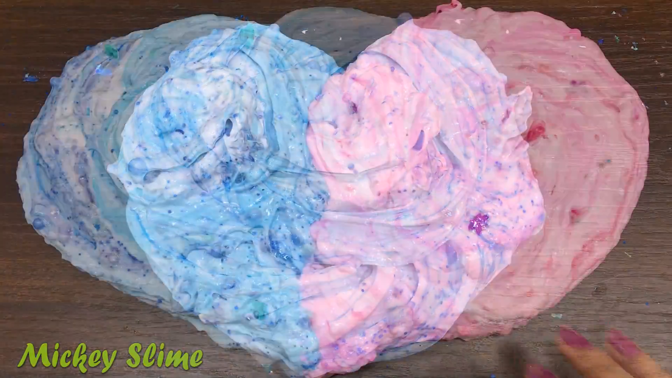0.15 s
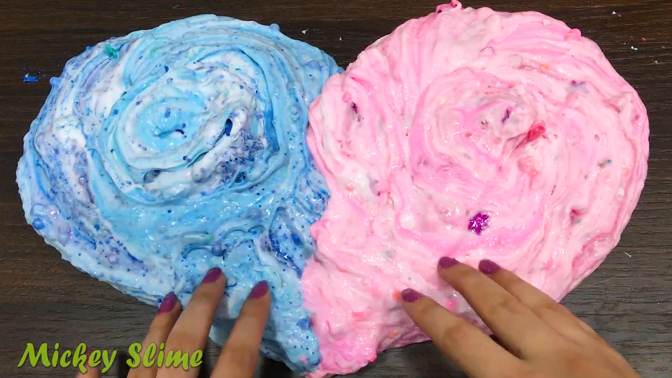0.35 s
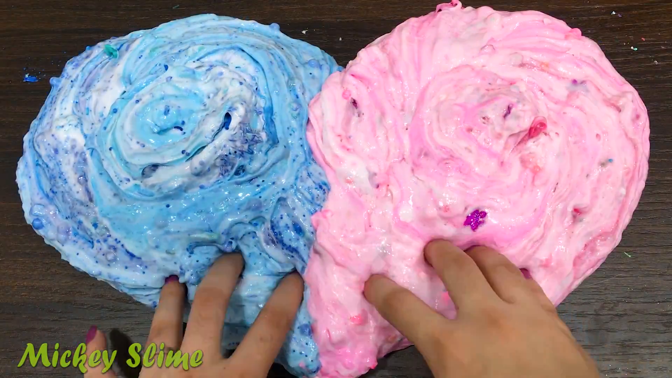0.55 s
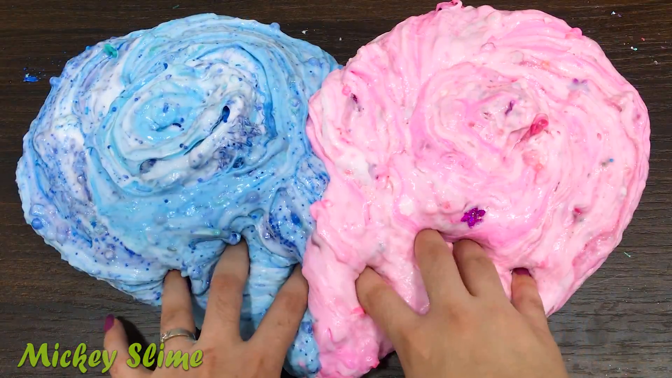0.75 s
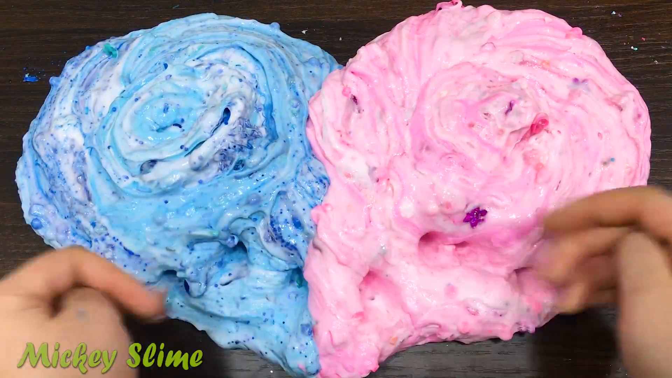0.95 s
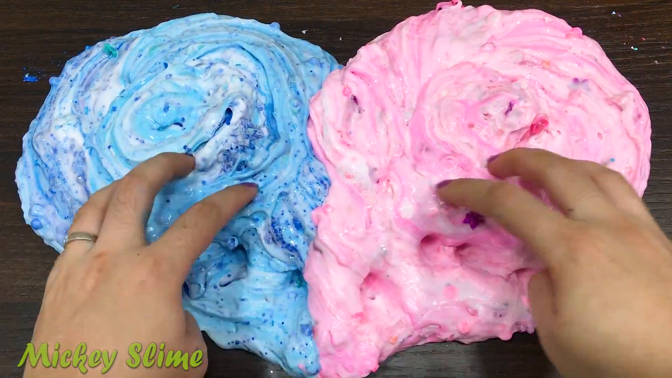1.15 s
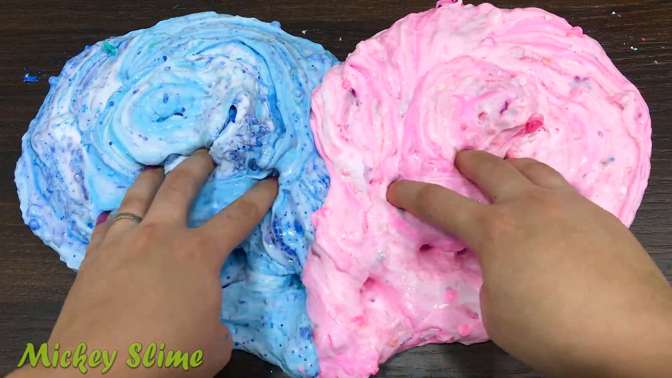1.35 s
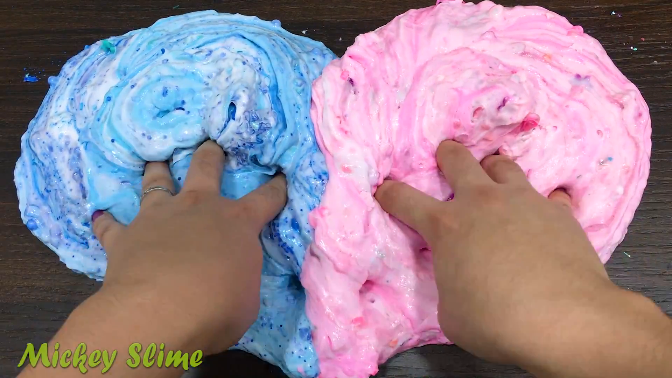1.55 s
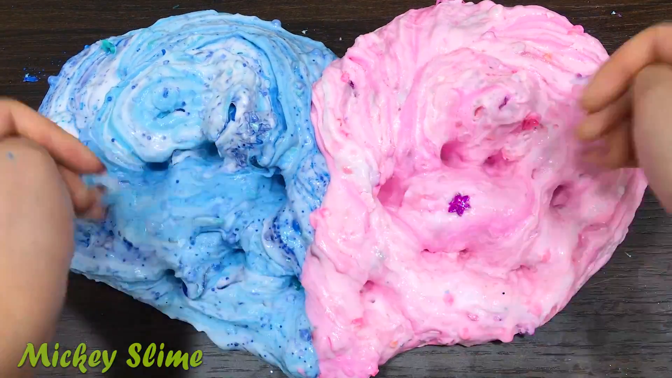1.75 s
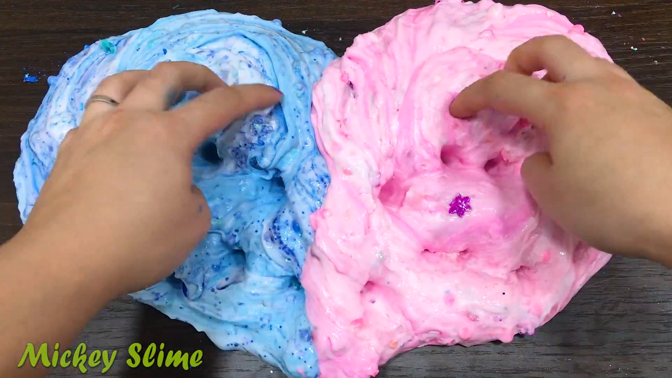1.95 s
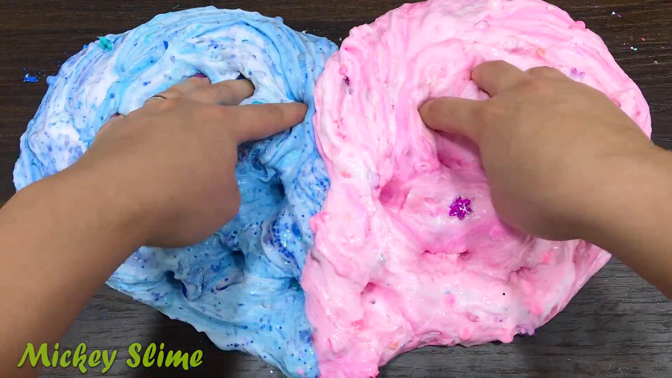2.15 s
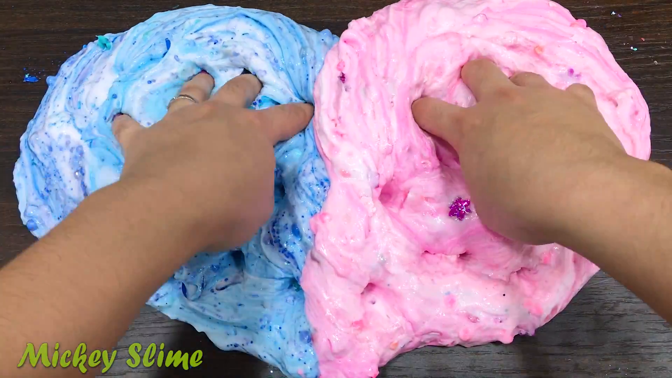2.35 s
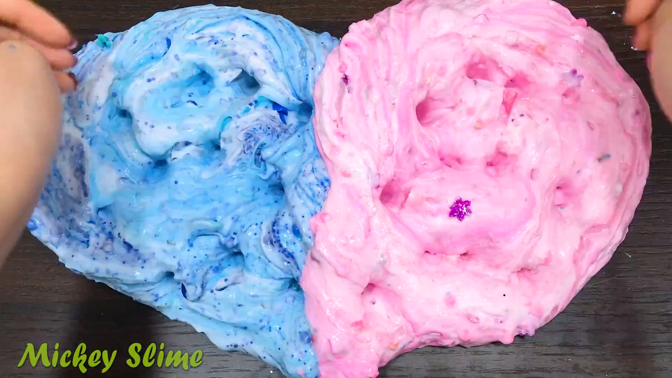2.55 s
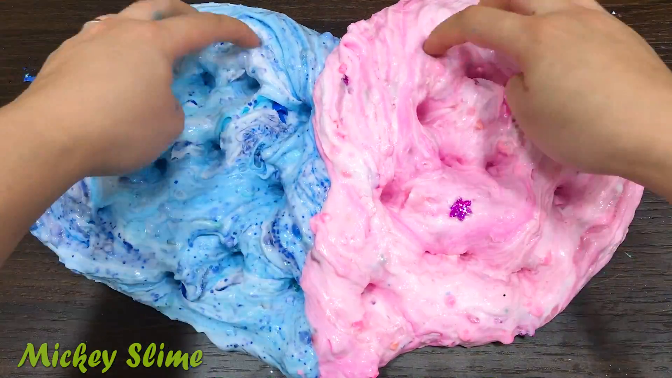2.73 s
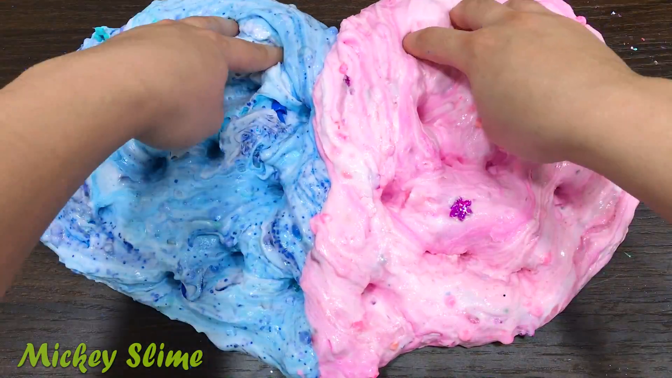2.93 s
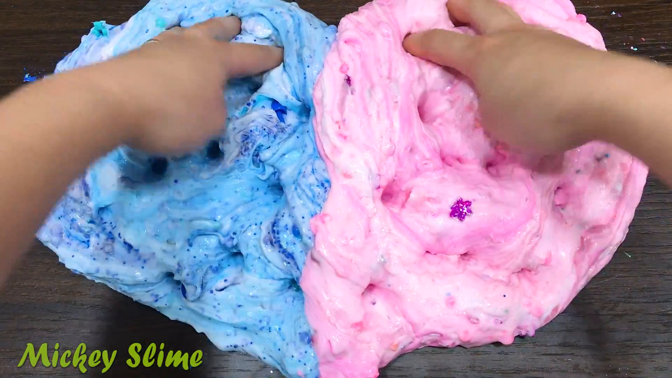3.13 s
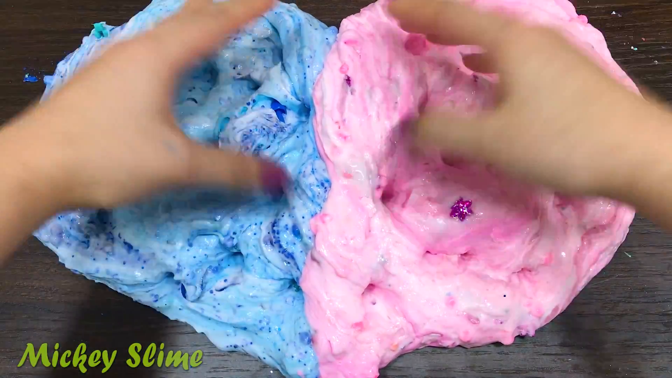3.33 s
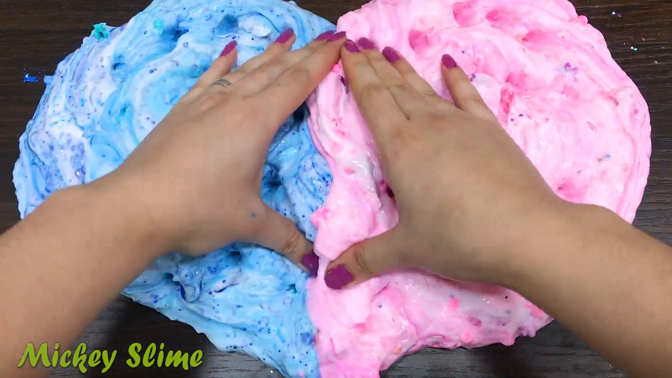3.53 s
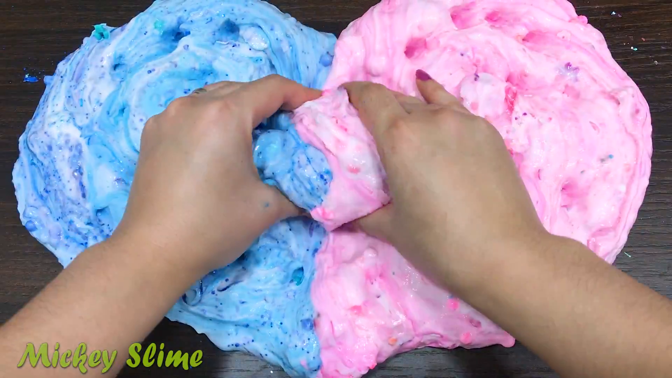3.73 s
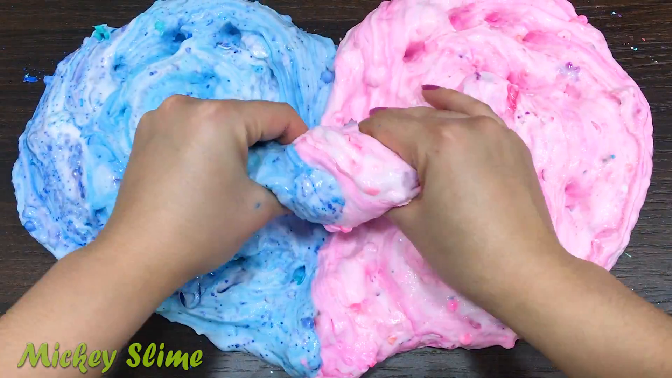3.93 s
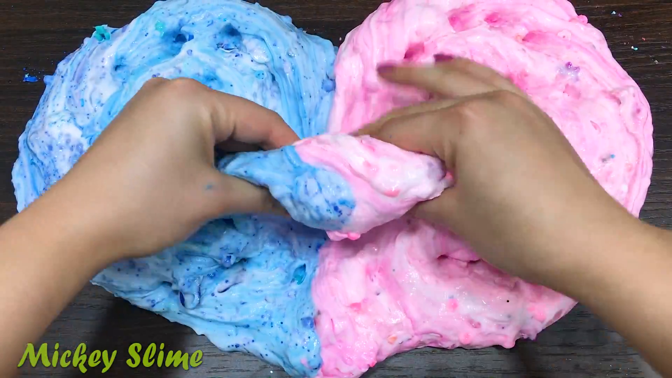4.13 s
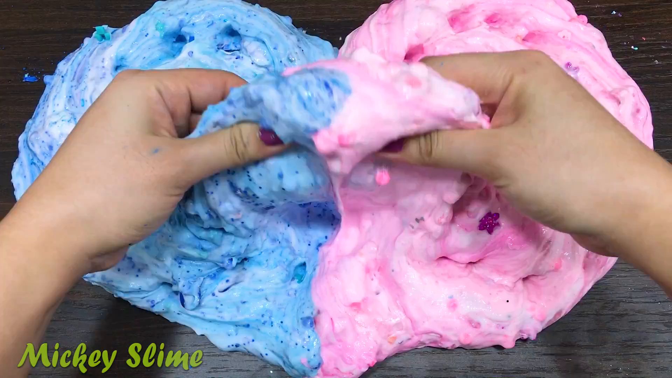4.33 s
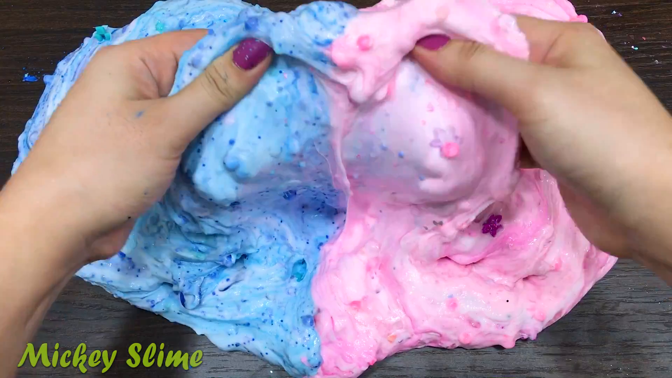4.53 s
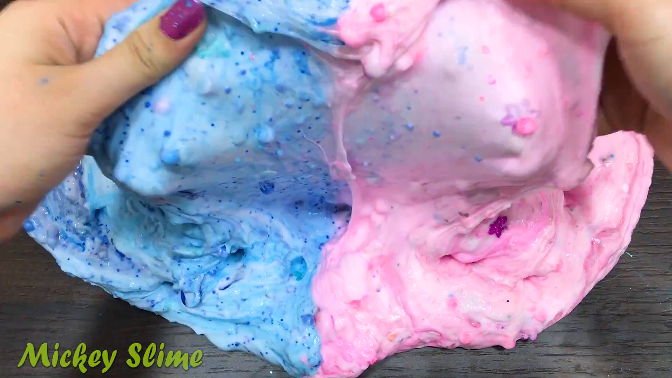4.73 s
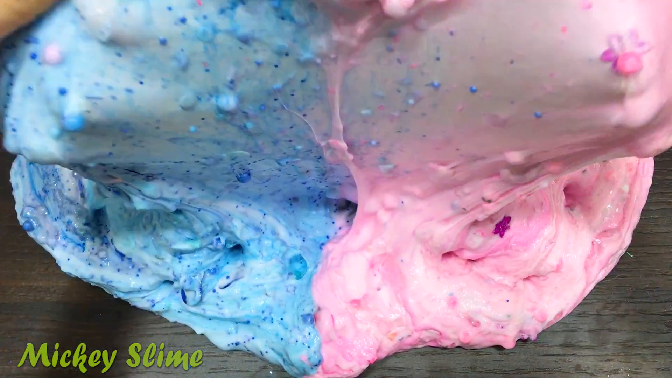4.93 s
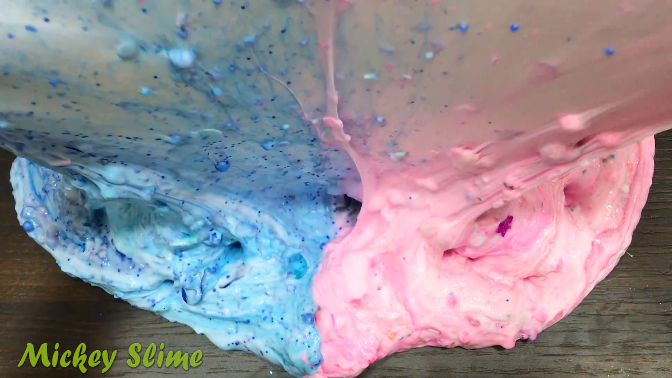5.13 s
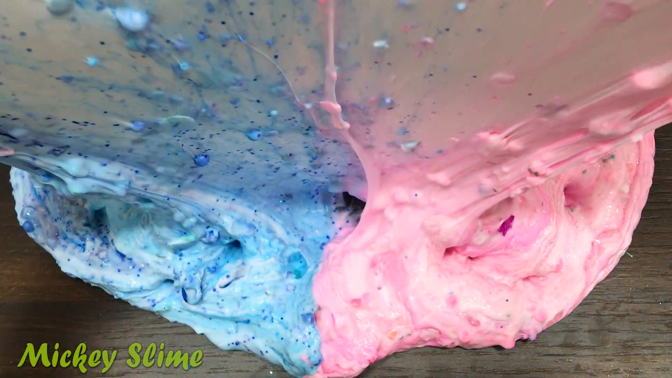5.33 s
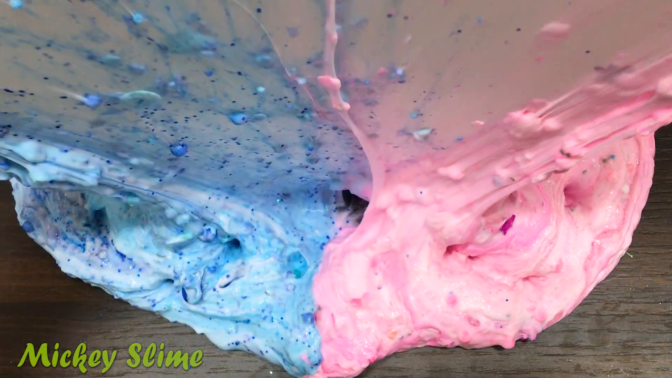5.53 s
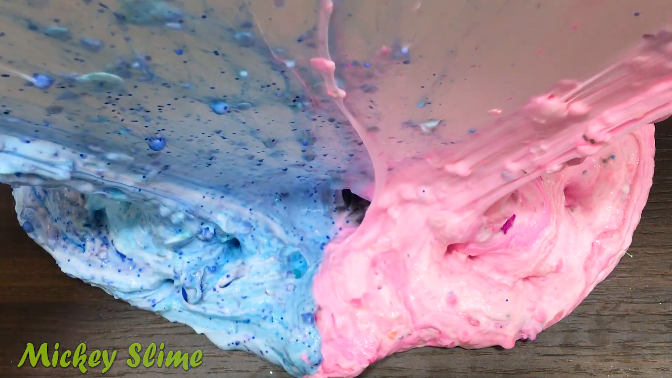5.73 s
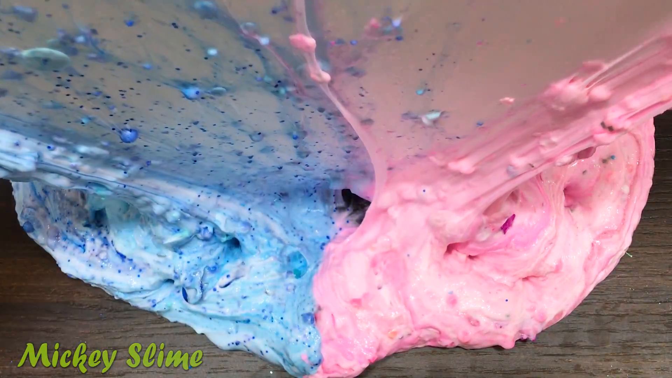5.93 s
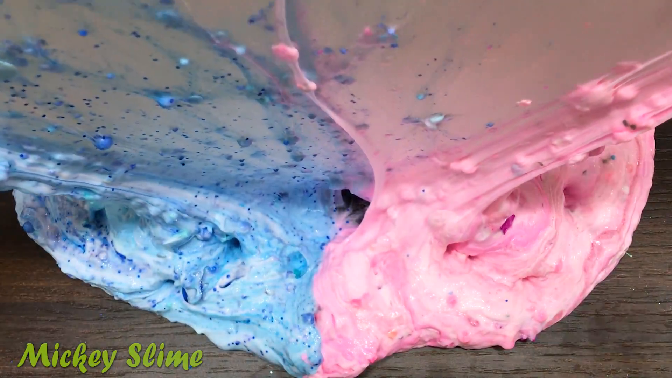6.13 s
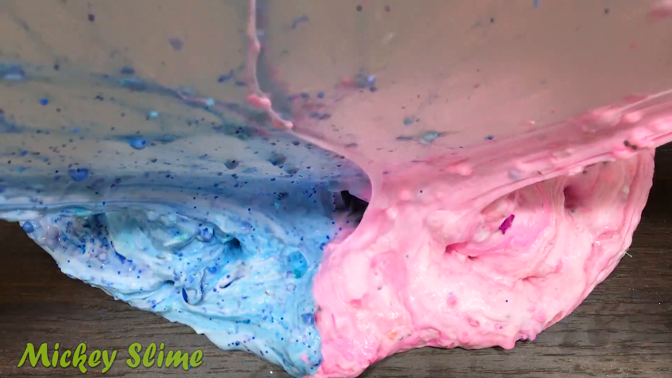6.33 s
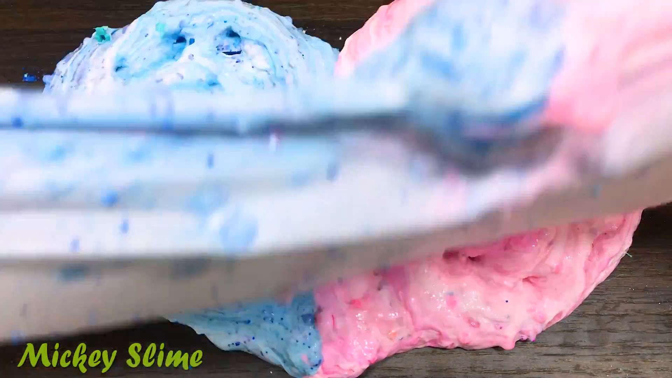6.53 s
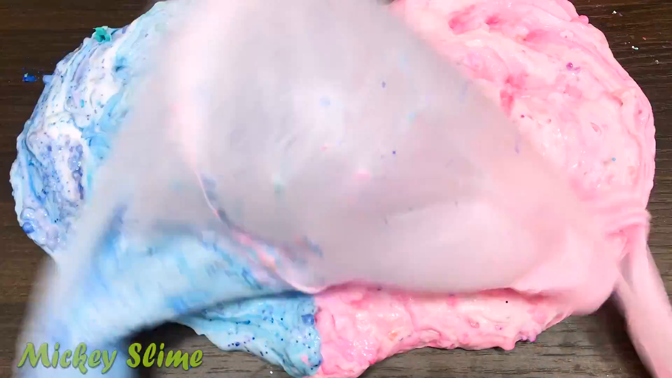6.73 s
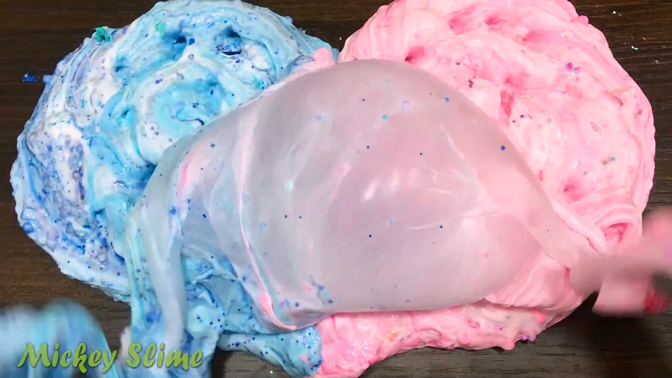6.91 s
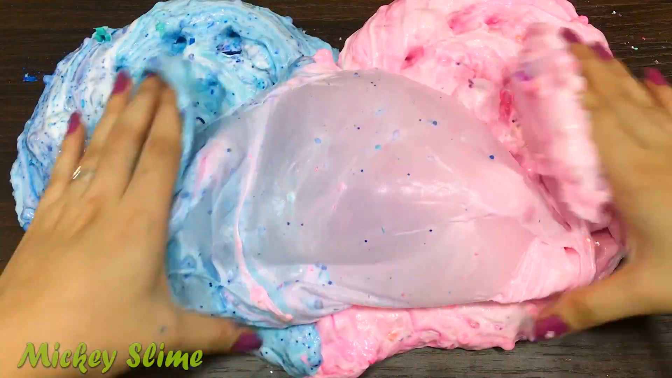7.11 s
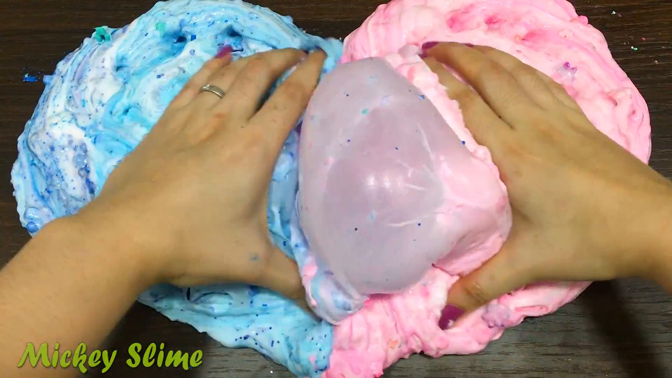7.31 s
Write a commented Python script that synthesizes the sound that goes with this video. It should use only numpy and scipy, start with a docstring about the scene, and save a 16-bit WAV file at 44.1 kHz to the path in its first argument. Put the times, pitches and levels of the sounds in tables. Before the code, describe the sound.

Fingers knead foamy beaded slime, quiet crackling broken by four loud wet peels, a faint stretch, and one heavy popping flop that echoes briefly.

```python
"""A bare, ringing room, heard close to a heap of wet slime that fingers press and tear free of four times;
then a sheet is lifted, stretched and dropped as a bubble. Bursting air pockets are sub-millisecond noise
bursts in set bands; plops and thuds are gliding decaying sines; foam is random ruptures and ringing bubbles.
Resonant hollows colour each peel, and wall echoes and a diffuse tail answer it. Low air noise lies below all,
and the sound of earlier handling fades from the start, then stops abruptly."""
import sys
import numpy as np
from scipy import signal
from scipy.fft import rfft, irfft, next_fast_len
from scipy.io import wavfile

SR = 44100
rng = np.random.default_rng(int(sys.argv[2]) if len(sys.argv) > 2 else 0)


def transcribe(signal):
    """Save signal, clipped to [-1, 1], as a 16-bit WAV file at the path in sys.argv[1]."""
    frames = np.atleast_2d(signal).T
    limited = np.clip(frames, -1, 1)
    pcm = np.round(limited * 32767).astype(np.int16)
    wavfile.write(sys.argv[1], SR, pcm)


N = 329416
TIME = np.arange(N) / SR  # seconds

# Spectrum of earlier handling, relative: pitch_hz, density_db (per Hz)
EARLIER_SPECTRUM = [(30, -14), (100, -13), (330, 1.5), (900, -12), (2000, -9), (8000, -14.5), (16000, -23)]
# Spectrum of the background air, relative: pitch_hz, density_db (per Hz)
AIR_SPECTRUM = [(20, -27), (35, -16), (55, 3.5), (130, -4), (200, -7), (350, -10), (500, -15.5),
                (1000, -21.5), (3000, -24.5), (8000, -28.5), (16000, -36.5)]
# Fingers pressing, pinching or pulling, levels before the mix: start_s, hold_s, crackle_db, squish_db
STROKES = [(0.536, 0.18, -65.5, -75.5), (1.24, 0.28, -62, -60), (2.086, 0.016, -49.5, -52),
           (2.232, 0.026, -60, -59.5), (2.87, 0.19, -74, -71.5), (3.64, 0.34, -58, -66),
           (4.148, 0.043, -50.5, -55.5), (4.461, 0.29, -59.5, -71), (5.018, 0.67, -65.5, -81),
           (7.27, 0.26, -56.5, -57.5)]
# Tiny bubbles: pitch_hz, size_db
FIZZ_BUBBLES = [(800, -1.5), (2500, -6.5), (5000, 7.5), (9000, -0.5), (12000, 6), (14500, -11)]
# Larger, wet bubbles: pitch_hz, size_db
SQUELCH_BUBBLES = [(350, 4), (800, 0), (1500, 3), (2600, -11)]
# Spectrum of tearing foam, relative: pitch_hz, density_db (per Hz)
FOAM_SPECTRUM = [(200, -19.5), (700, -12.5), (2500, 1), (5000, 9), (9000, 4.5), (13000, 9.5), (16000, 10.5)]
# Spectrum of the soft wet mass, relative: pitch_hz, density_db (per Hz)
SQUISH_SPECTRUM = [(40, -19), (150, -3), (400, -0.5), (1000, -10), (2200, -7), (4000, -18), (10000, -36)]
# Larger air pockets bursting, levels before the mix: start_s, level_db (over 1 ms), low_edge_hz, high_edge_hz
POCKET_BURSTS = [(.5947, -38, 9200, 13300), (.6594, -39.5, 2750, 15600), (.7818, -50, 660, 13500),
                 (.7977, -51, 1210, 12900), (.961, -33, 890, 13700), (.9702, -13.5, 603, 16900),
                 (.9947, -16.5, 660, 11000), (.9982, -11.5, 1030, 16200), (1.006, -22, 2960, 4100),
                 (1.015, -15, 910, 9040), (1.0344, -27, 900, 10200), (1.2693, -26, 4040, 16750),
                 (1.272, -30.5, 1497, 16500), (1.3193, -35.5, 4460, 15900), (1.3365, -24, 4630, 15900),
                 (1.543, -27.5, 10100, 13000), (1.5945, -30.5, 3830, 16500), (1.7651, -25, 990, 11600),
                 (1.7763, -32, 490, 8600), (1.7995, -13.5, 3900, 8500), (1.803, -19, 487, 12300),
                 (2.23, -40, 1370, 3000), (2.2557, -42.5, 6600, 16300), (2.5323, -22, 7450, 10100),
                 (2.5385, -27, 990, 8950), (2.5415, -15, 1070, 11000), (2.5607, -11.5, 1180, 10500),
                 (2.575, -27, 1960, 2960), (2.8867, -37.5, 6000, 16800), (2.9481, -36, 7600, 16500),
                 (3.1843, -41.5, 1800, 16500), (3.2735, -17.5, 660, 16600), (3.2763, -13.5, 1510, 11600),
                 (3.6182, -13, 2960, 12000), (3.7158, -21, 1010, 9600), (3.767, -31.5, 1480, 16500),
                 (3.9102, -35, 490, 2720), (3.913, -34, 1350, 3340), (3.9184, -22, 7240, 16500),
                 (4.189, -43.5, 600, 6500), (4.4102, -34, 1100, 5500), (4.4855, -42, 7360, 9500),
                 (4.603, -39, 730, 6700), (4.6442, -43, 1100, 1540), (4.8705, -42, 3570, 16500),
                 (5.0363, -45, 1480, 7150), (5.129, -43, 1480, 9900), (5.1507, -32, 1250, 2450),
                 (5.4416, -46, 1970, 14500), (5.5526, -42, 985, 1340), (5.5691, -34.5, 1000, 1366),
                 (6.1777, -41.5, 4900, 13670), (6.8123, -28.5, 2360, 3420), (6.8316, -15.5, 1930, 10000),
                 (6.846, -31, 8140, 10600), (6.8572, -13, 400, 10000), (6.8594, -18, 400, 2130),
                 (7.2748, -33.5, 2980, 6340), (7.2956, -35.5, 2770, 3640), (7.328, -38, 3050, 3970),
                 (7.4365, -36.5, 600, 12200)]
# Early reflections: delay_s, level_db
WALL_ECHOES = [(.0045, -20.5), (.0065, -17.5), (0.0099, -18), (0.0119, -20)]
# Time for the tail to die by 60 dB: pitch_hz, decay_s
ROOM_DECAY = [(100, 0.74), (260, 0.42), (700, 0.76), (1840, 0.76), (4850, 0.73), (9000, 0.67),
              (15000, 0.72)]
# Colour of the diffuse tail: pitch_hz, gain_db
ROOM_COLOUR = [(60, -2), (200, 0.5), (400, -1.5), (750, 0.5), (1200, -3), (2500, -1.5), (5000, -5),
               (8500, -6), (12000, -8.5), (16000, -14.5)]
# Standing waves of the room, levels before the tail's gain: pitch_hz, level_db
STANDING_WAVES = [(300, -61), (358, -57.5), (491, -62), (689, -67.5), (733, -61.5), (1031, -68.5)]
# Slime peeling from skin or table, or the sheet landing, levels before the top-edge filter and the mix:
# full_strength_s, rise_s, hold_s, foam_db, body_db, high_edge_hz (foam only), hollow_pitch_hz
PEELS = [(0.964, 0.013, 0.037, -35, -48, 15500, 1540), (1.776, 0.02, 0.044, -30, -35.5, 12400, 2470),
         (2.557, 0.026, 0.0047, -24.5, -34.5, 11700, 2470), (3.275, 0.029, 0.018, -28, -39.5, 11500, 1320),
         (4.411, 0.014, 0.058, -45, -64.5, 5300, 4100), (6.807, 0.086, 0.018, -44, -51.5, 7600, 4350),
         (6.835, 0.0061, 0.03, -24.5, -41, 10800, 1030)]
# Resonances of a hollow: pitch_multiple (of the hollow's pitch), added_db
HOLLOW_MODES = [(1, -1), (1.98, -6), (3.1, -13)]
# Cavities that open or shut: start_s, peak_db, pitch_hz (near the peak), cycles_to_peak
PLOPS = [(.9695, -24, 685, 0.58), (.996, -23, 460, 0.78), (1.000, -27.5, 320, 1), (1.035, -29, 640, 0.89),
         (1.777, -30, 314, 1.4), (1.794, -28, 380, 2), (1.807, -28.5, 345, 1.14), (2.541, -27.5, 580, 1),
         (2.566, -20.5, 536, .8), (2.573, -22, 780, 1.2), (3.271, -21.5, 946, 0.68),
         (3.2925, -23.5, 830, 0.92), (3.311, -27, 700, .6), (3.618, -35, 674, 0.6),
         (5.5683, -34, 430, 0.88), (6.856, -16.5, 930, 0.86), (6.857, -26, 283, 0.82),
         (6.862, -22, 478, 0.85)]
# Thumps of the soft mass: start_s, peak_db, pitch_hz (near the peak)
THUDS = [(0.973, -38, 76), (1.796, -39, 100), (2.554, -33.5, 88), (3.27, -36, 72), (5.57, -30.5, 220),
         (6.855, -25, 131)]
# Colour of the microphone: pitch_hz, gain_db
MICROPHONE = [(20, -17), (45, -5), (100, -2), (1000, -0.5), (3200, -1.5), (4800, -2), (6500, -2),
              (8700, 1.5), (11000, -0.5), (13500, 0), (15000, 2), (16500, -9.5)]

AIR_DB = -64
STROKE_ATTACK_S, STROKE_RELEASE_S = 0.05, 0.077  # each spans 20 dB
CONTACT_S, SHEET_THIN_S = 0.55, 5.54  # first touch, and when the sheet is drawn thin
REST_CRACKLE_DB, REST_SQUISH_DB = -69, -70.5  # before the mix
REST_ATTACK_S, REST_RELEASE_S = 0.33, 0.42  # each spans 20 dB
HOLLOW_LEAD_S, HOLLOW_OPEN_S = 0.025, 0.082  # opening ahead of the peel's full strength; time open
PEEL_RELEASE_S = 0.045  # time to die by 20 dB
THUD_CYCLES = 0.54  # cycles until the peak
TOP_HZ = 16300  # upper band limit


def amp(db):
    """Decibel law: level to amplitude ratio."""
    return 10 ** (np.asarray(db) / 20)


def unit(x):
    """Normalisation to an rms of 1."""
    return x / np.sqrt(np.mean(x ** 2) + 1e-20)


def along(points, hz):
    """Interpolation of (Hz, value) points on a logarithmic frequency axis."""
    point_hz, values = np.transpose(points)
    return np.interp(np.log(hz + 1), np.log(point_hz + 1), values)


def filtered(x, gain):
    """Linear filtering: the spectrum is multiplied by a frequency-dependent gain."""
    size = next_fast_len(len(x) + 8192)
    hz = np.fft.rfftfreq(size, 1 / SR)
    return irfft(rfft(x, size) * gain(hz), size)[:len(x)]


def coloured(x, spectrum):
    """Spectral shaping by a table of (Hz, dB)."""
    return filtered(x, lambda hz: amp(along(spectrum, hz)))


def add(track, start_s, sound):
    """Superposition: a sound is summed into the track at its start time."""
    start = max(round(start_s * SR), 0)
    track[start:start + len(sound)] += sound[:max(N - start, 0)]


def earlier_tail(db=-53, fade_db_per_s=45, cut_s=0.152):
    """Exponential decay: the room's ringing after earlier handling fades, then stops abruptly."""
    ringing = unit(coloured(rng.standard_normal(N), EARLIER_SPECTRUM))
    return amp(db - fade_db_per_s * TIME) * (TIME < cut_s) * ringing


def air():
    """Stationary coloured noise: a low, steady rumble with faint hiss."""
    return amp(AIR_DB) * unit(coloured(rng.standard_normal(N), AIR_SPECTRUM))


def swell(full_s, attack_s, hold_s, release_s):
    """Exponential growth and decay about a hold; attack and release each span 20 dB."""
    before = (full_s - TIME) / attack_s
    after = (TIME - full_s - hold_s) / release_s
    return np.exp(-np.log(10) * np.clip(np.maximum(before, after), 0, 10))


def effort():
    """Addition of powers: strokes swell above resting hands, giving gains of crackle and squish."""
    rest = swell(CONTACT_S, REST_ATTACK_S, SHEET_THIN_S - CONTACT_S, REST_RELEASE_S)
    power = np.outer(amp([REST_CRACKLE_DB, REST_SQUISH_DB]), rest) ** 2
    for start_s, hold_s, crackle_db, squish_db in STROKES:
        stroke = swell(start_s, STROKE_ATTACK_S, hold_s, STROKE_RELEASE_S)
        power += np.outer(amp([crackle_db, squish_db]), stroke) ** 2
    return np.sqrt(power)


def bubbles(spectrum, rate, spread_db, ring_s):
    """Damped resonance: bubbles burst at random, each ringing briefly at its own pitch; rms 1."""
    count = int(rate * N / SR)  # rate in bubbles per second
    place, pitch, strength, life = rng.random((count, 4)).T
    lowest_hz, highest_hz = spectrum[0][0], spectrum[-1][0]
    hz = lowest_hz + (highest_hz - lowest_hz) * pitch
    t = np.arange(300) / SR
    age = t / (ring_s * (0.5 + life))[:, None]  # ring_s is the mean life
    # Most bubbles are small, a few large
    size = amp(-spread_db * np.log(np.maximum(strength, 0.02)) + along(spectrum, hz))
    envelope = size[:, None] * age * np.exp(-age) * (1 - t / t[-1])
    rings = envelope * np.sin(2 * np.pi * hz[:, None] * t)
    positions = (place * N).astype(int)[:, None] + np.arange(len(t))
    return unit(np.bincount(positions.ravel(), rings.ravel(), N)[:N])


def grains(spectrum, rate, spread_db):
    """Random impulse process: tiny ruptures of random time, sign and size, coloured to rms 1."""
    size_db = spread_db * np.clip(rng.standard_normal(N), -2, 2)
    sizes = amp(size_db) * rng.choice([-1, 1], N)
    ruptures = sizes * (rng.random(N) < rate / SR)  # rate in ruptures per second
    return unit(coloured(ruptures, spectrum))


def kneading(crackle, squish, crackle_db=-2, squish_db=-3, fizz_db=-2, hiss_db=-4, squelch_db=-4, clump_db=1.0):
    """Bubble resonance by size: small ones crackle in clumps over hiss, large ones squelch in the mass."""
    clump_times = np.linspace(0, N / SR, 300)
    clumps = amp(clump_db * np.interp(TIME, clump_times, rng.standard_normal(300)))
    small = bubbles(FIZZ_BUBBLES, rate=450, spread_db=5, ring_s=0.00014)
    large = bubbles(SQUELCH_BUBBLES, rate=130, spread_db=4, ring_s=0.0007)
    hiss = grains(FOAM_SPECTRUM, rate=11000, spread_db=1)
    fine = amp(fizz_db) * clumps * small + amp(hiss_db) * hiss
    soft = amp(squelch_db) * large + grains(SQUISH_SPECTRUM, rate=770, spread_db=5.5)
    return amp(crackle_db) * crackle * fine + amp(squish_db) * squish * soft


def small_pockets(gain, rate=12, over_db=13, scatter_db=3, lowest_hz=1000, highest_hz=8000, band_ratio=4.3):
    """Random bursting: rows like POCKET_BURSTS, their levels following the crackle gain."""
    count = int(rate * N / SR)  # rate in pockets per second
    place, size, strength = rng.random((count, 3)).T
    gain_db = 20 * np.log10(gain[(place * N).astype(int)] + 1e-9)
    db = gain_db + over_db + scatter_db * (2 * strength - 1)
    low_hz = lowest_hz * (highest_hz / lowest_hz) ** size
    return np.transpose([place * N / SR, db, low_hz, low_hz * band_ratio])


def snaps(rows, rise_s=0.00008, fall_s=0.00056, skirt_db=-22):
    """Impulsive film rupture: each pocket's size sets the band, above a weak low skirt."""
    out, lead = np.zeros(N), 64  # lead in samples ahead of the burst
    t = (np.arange(512) - lead) / SR
    envelope = np.exp(-np.maximum(-t / rise_s, t / fall_s))
    hz = np.fft.rfftfreq(len(t), 1 / SR) + 1
    noises = rng.standard_normal((len(rows), len(t)))
    for (start_s, db, low_hz, high_hz), noise in zip(rows, noises):
        tear = rfft(noise * envelope)
        above = 1 / np.sqrt(1 + (low_hz / hz) ** 6) + amp(skirt_db) * hz / (hz + 700)
        below = 1 / np.sqrt(1 + (hz / high_hz) ** 10)
        burst = irfft(tear / abs(tear) * above * below)  # only the tear's phase is kept
        burst *= np.sqrt(SR / 1000 / np.sum(burst ** 2))  # energy of rms 1 over 1 ms
        add(out, start_s - lead / SR, amp(db) * burst)
    return out


def room_tail(gap_s=0.0095, build_s=0.00056, early_db=3, early_s=0.033):
    """Diffuse reverberation: each frequency dies at its own speed, joined by standing waves."""
    hz, t, spectrum = signal.stft(rng.standard_normal(SR), SR, nperseg=256)
    decay = amp(-60 * t / along(ROOM_DECAY, hz)[:, None])
    tail = signal.istft(spectrum * decay, SR, nperseg=256)[1]
    age = np.maximum(np.arange(len(tail)) / SR - gap_s, 0)
    tail = tail * (1 - np.exp(-age / build_s)) * amp(early_db * np.exp(-age / early_s))
    tail = coloured(tail / np.linalg.norm(tail), ROOM_COLOUR)
    for mode_hz, db in STANDING_WAVES:
        fade = amp(db - 60 * age / along(ROOM_DECAY, mode_hz))
        tail += fade * np.sin(2 * np.pi * mode_hz * age)
    return tail


def room(x, tail_db=-3, wall_hz=2500):
    """Reflection and reverberation: dull wall echoes and a tail redrawn for each 0.75 s of sound."""
    out, size = np.zeros(N), SR * 3 // 4
    for start in range(0, N, size):
        reverberation = signal.fftconvolve(x[start:start + size], room_tail())
        add(out, start / SR, amp(tail_db) * reverberation)
    dull = signal.lfilter(*signal.butter(1, wall_hz, fs=SR), x)
    for delay_s, db in WALL_ECHOES:
        add(out, delay_s, amp(db) * dull)
    return out


def hollows(x, sharpness=7):
    """Cavity resonance: each peel opens a hollow that rings with whatever bursts beside it."""
    out = x.copy()
    for full_s, *_, pitch_hz in PEELS:
        start_s = full_s - HOLLOW_LEAD_S
        inside = x[round(start_s * SR):round((start_s + HOLLOW_OPEN_S) * SR)]
        inside = np.pad(inside, (0, SR // 20))  # room for the ringing to die
        for multiple, db in HOLLOW_MODES:
            resonance = signal.iirpeak(multiple * pitch_hz, sharpness, fs=SR)
            add(out, start_s, amp(db) * signal.lfilter(*resonance, inside))
    return out


def peeling():
    """Adhesive tearing: a dense rush of foam over a wet body swells to each release and dies."""
    out = np.zeros(N)
    foam = grains(FOAM_SPECTRUM, rate=2500, spread_db=8.5)
    squelch = bubbles(SQUELCH_BUBBLES, rate=370, spread_db=4.5, ring_s=0.0021)
    body = unit(grains(SQUISH_SPECTRUM, rate=1300, spread_db=6.5) + amp(-7.5) * squelch)
    for full_s, rise_s, hold_s, foam_db, body_db, high_hz, _ in PEELS:
        tear = signal.lfilter(*signal.butter(2, high_hz, fs=SR), foam)
        envelope = swell(full_s, rise_s, hold_s, PEEL_RELEASE_S)
        out += envelope * (amp(foam_db) * tear + amp(body_db) * body)
    return out


def cavities(rows, glide):
    """Damped oscillation: each swells and dies within a few cycles as its pitch glides."""
    out, t = np.zeros(N), np.arange(SR // 8) / SR
    for start_s, db, hz, cycles in rows:
        age = t * hz / cycles  # 1 at the peak
        gliding_hz = hz * (1 + glide * (np.tanh(age / 2) - 0.5))
        phase = 2 * np.pi * np.cumsum(gliding_hz) / SR
        add(out, start_s, amp(db) * age ** 2 * np.exp(2 - 2 * age) * np.sin(phase))
    return out


def plops():
    """Cavity oscillation: finger holes open or shut with a slightly rising pitch."""
    return cavities(PLOPS, glide=0.041)


def thuds():
    """Damped oscillation of a soft mass: low thumps of falling pitch."""
    return cavities([(*row, THUD_CYCLES) for row in THUDS], glide=-0.23)


def scene():
    """Superposition of the close slime, its room and the background."""
    crackle, squish = effort()
    bursts = amp(-1.8) * snaps(POCKET_BURSTS) + amp(-1.0) * peeling()
    foam = kneading(crackle, squish) + snaps(small_pockets(crackle))
    slime = hollows(bursts + foam) + plops() + thuds()
    return (slime + room(slime) + earlier_tail() + air())[None]


def record(dry):
    """Linear transduction: the microphone's colour and a steep upper band limit."""
    def response(hz):
        return amp(along(MICROPHONE, hz)) / np.sqrt(1 + (hz / TOP_HZ) ** 160)
    return np.array([filtered(x, response) for x in dry])


dry = scene()
out = record(dry)
transcribe(out)
```